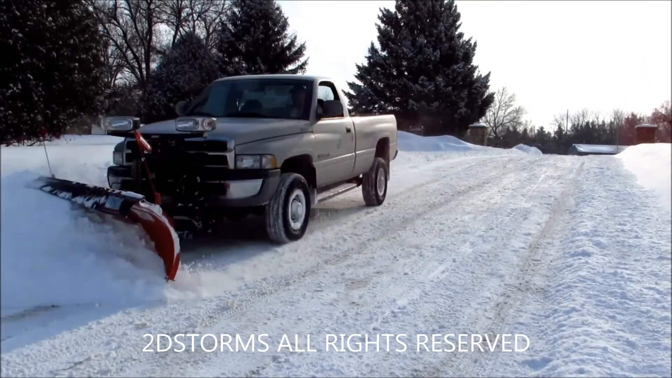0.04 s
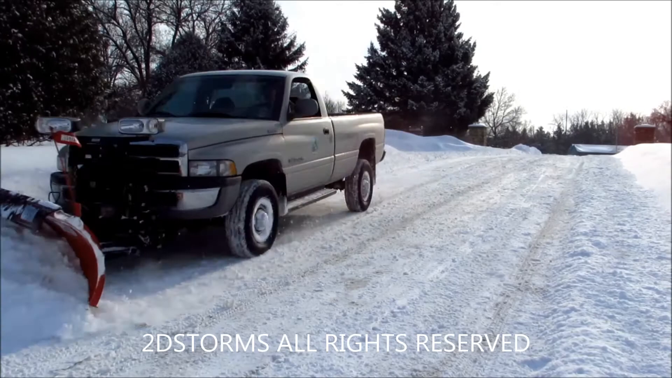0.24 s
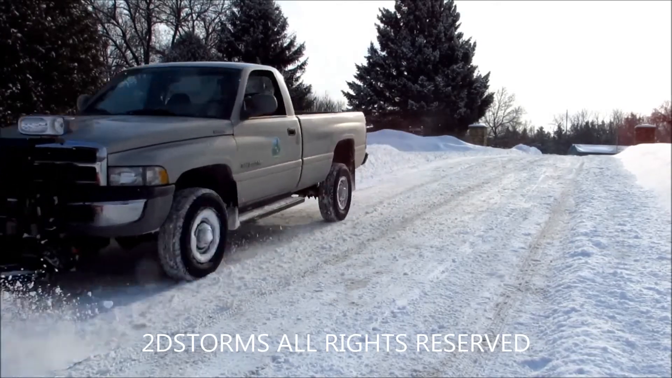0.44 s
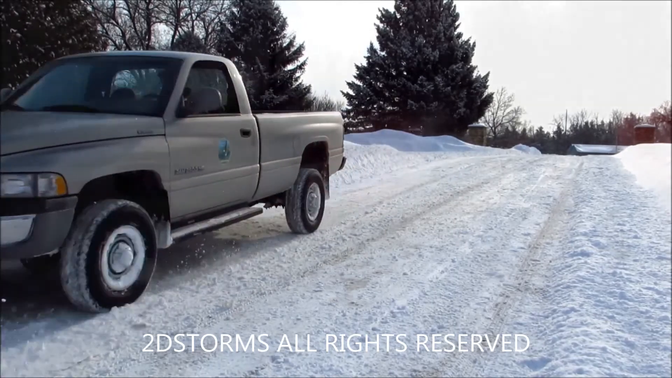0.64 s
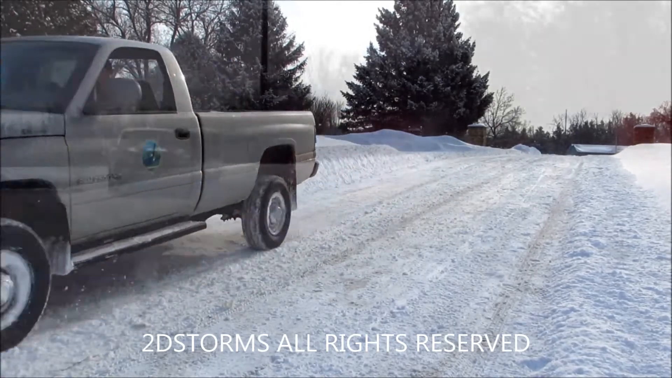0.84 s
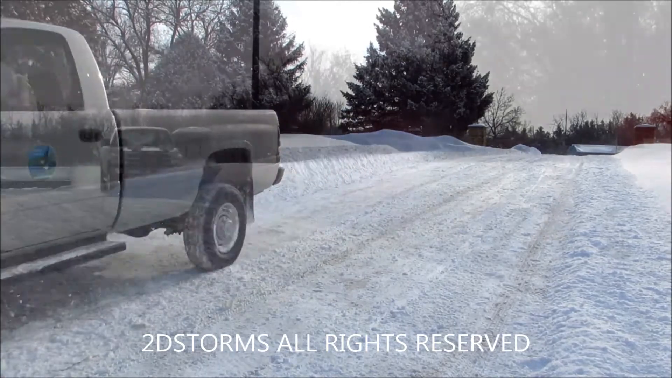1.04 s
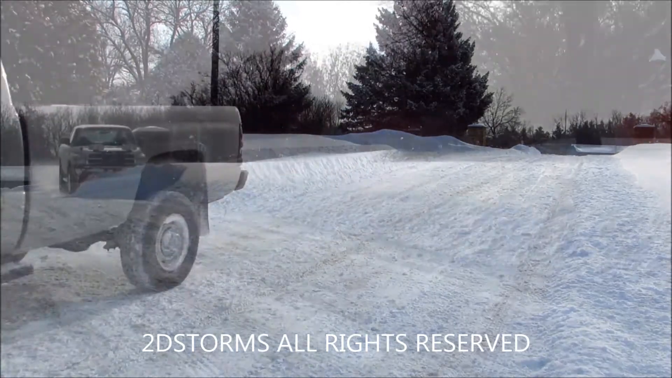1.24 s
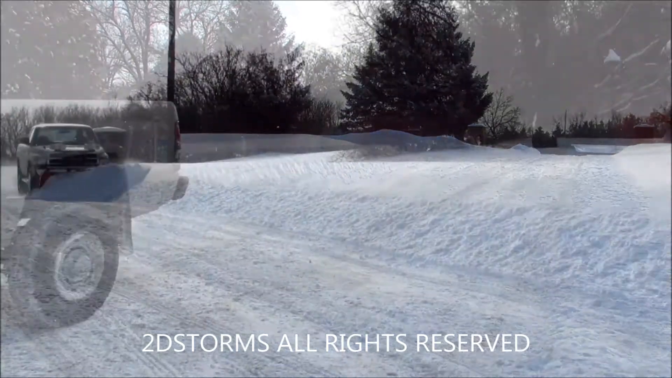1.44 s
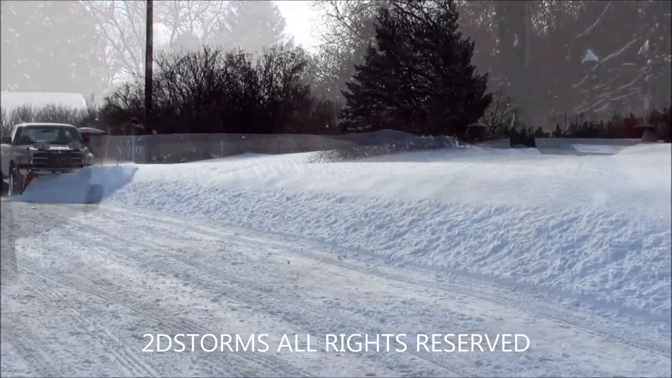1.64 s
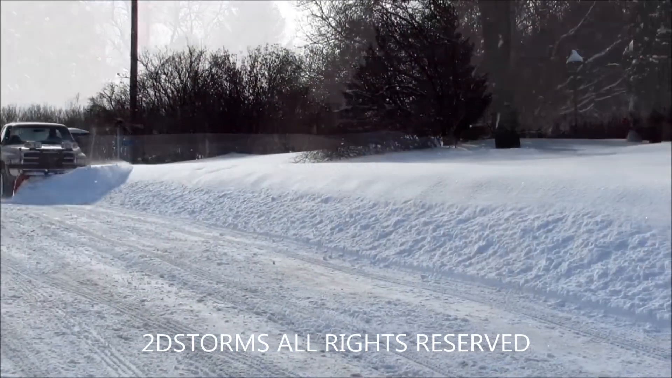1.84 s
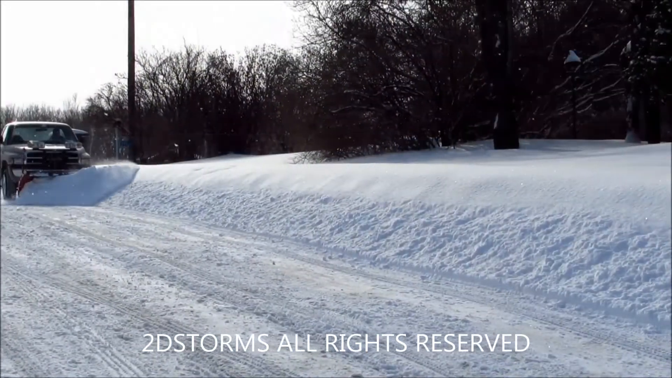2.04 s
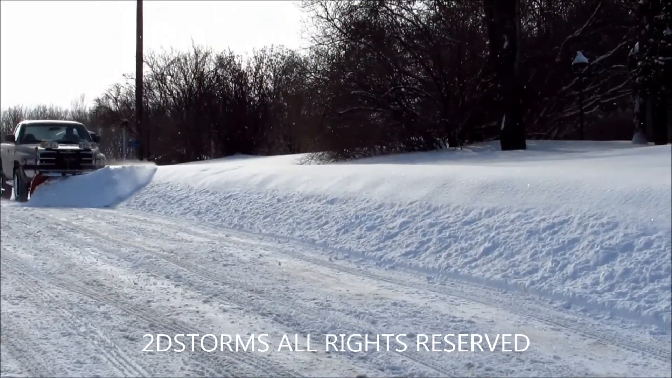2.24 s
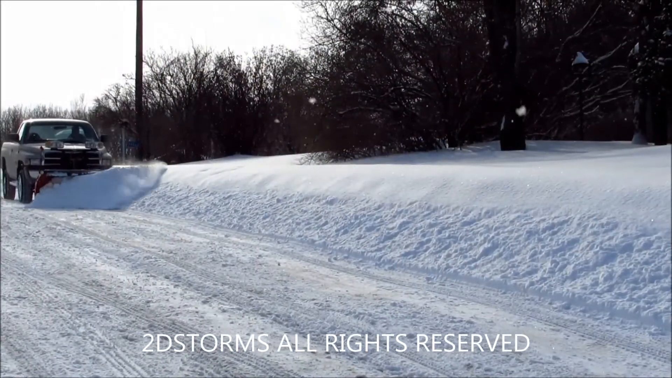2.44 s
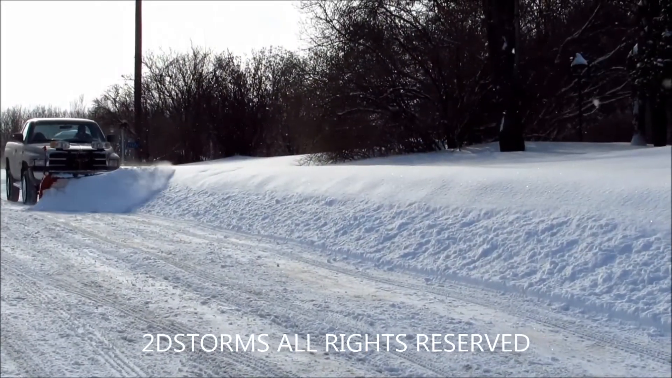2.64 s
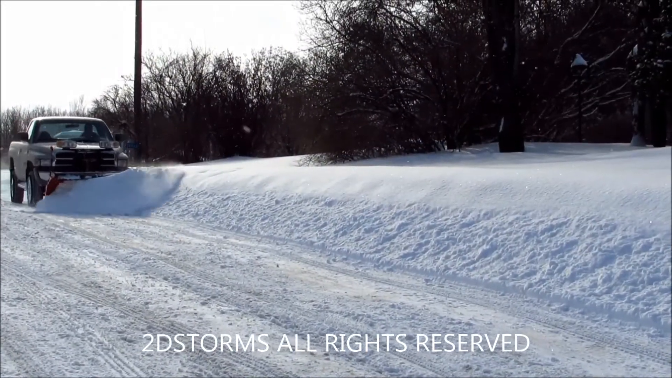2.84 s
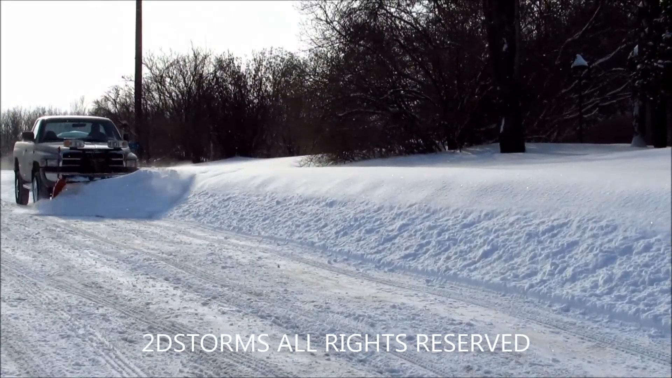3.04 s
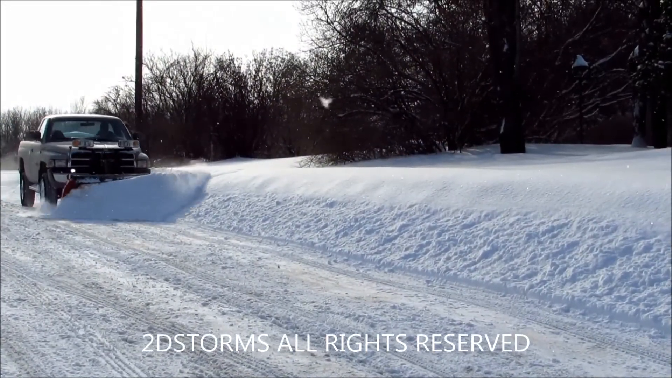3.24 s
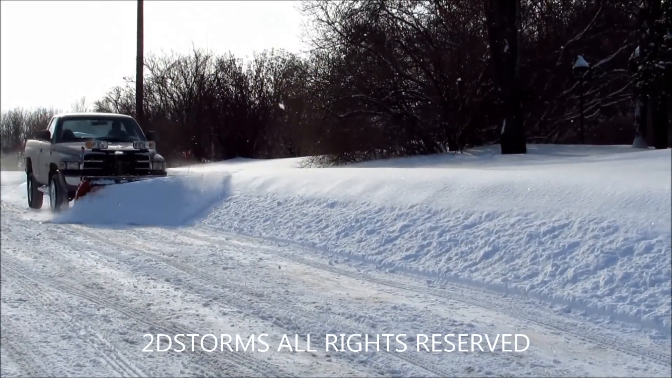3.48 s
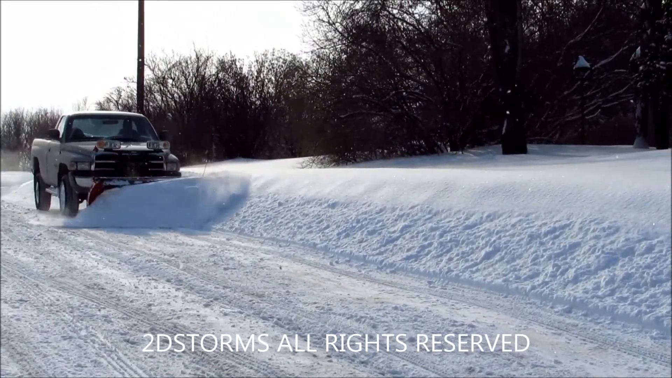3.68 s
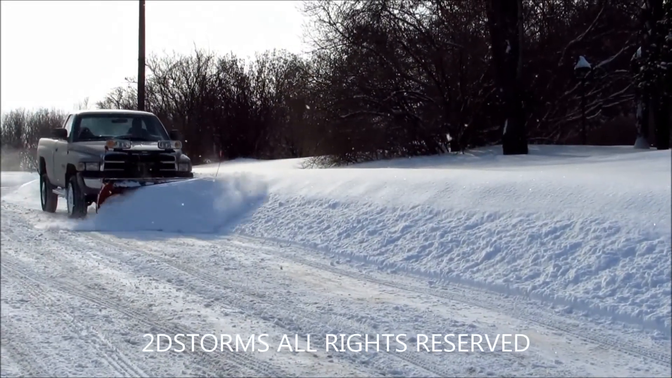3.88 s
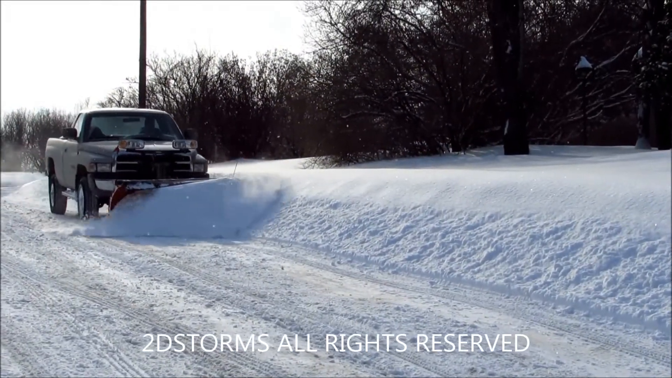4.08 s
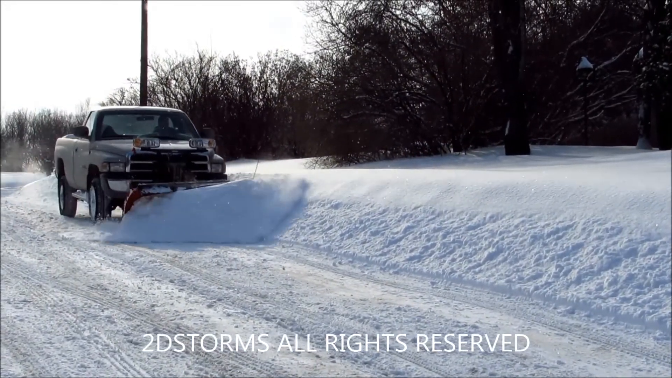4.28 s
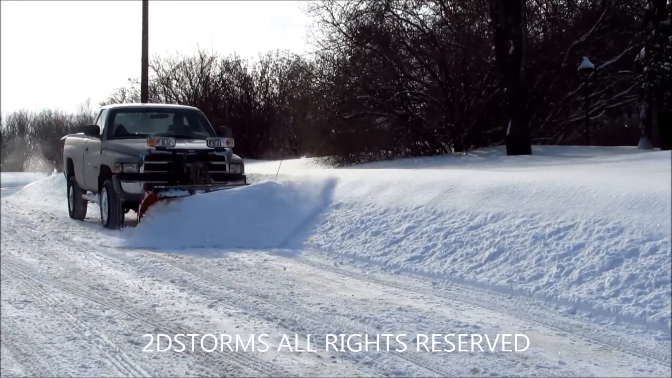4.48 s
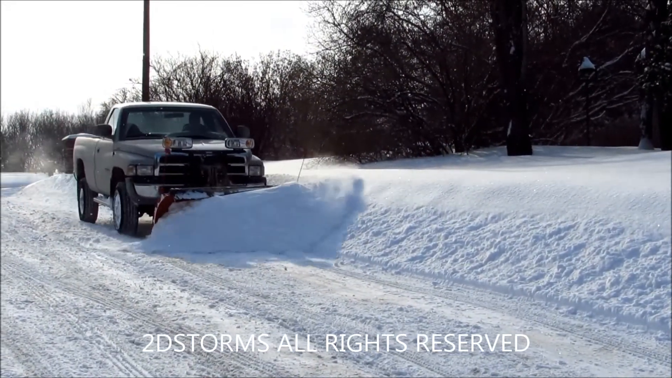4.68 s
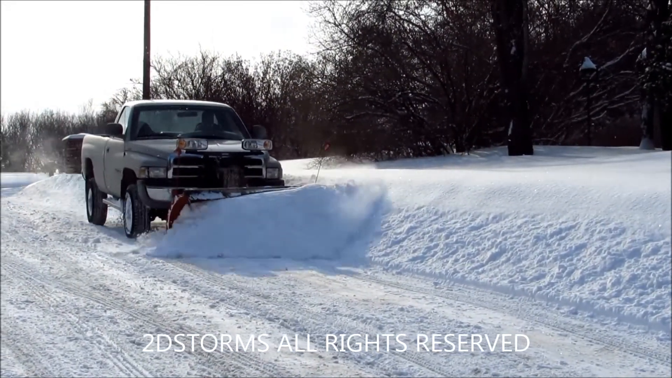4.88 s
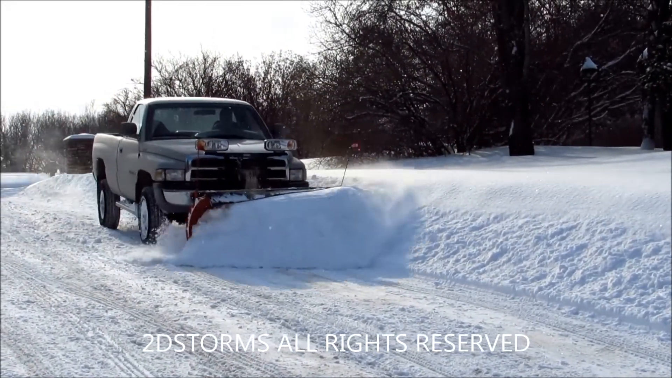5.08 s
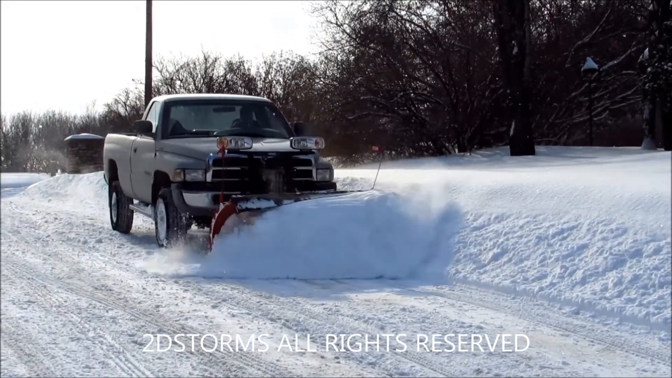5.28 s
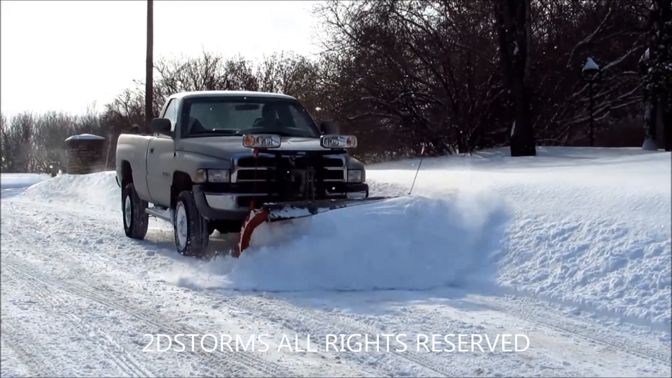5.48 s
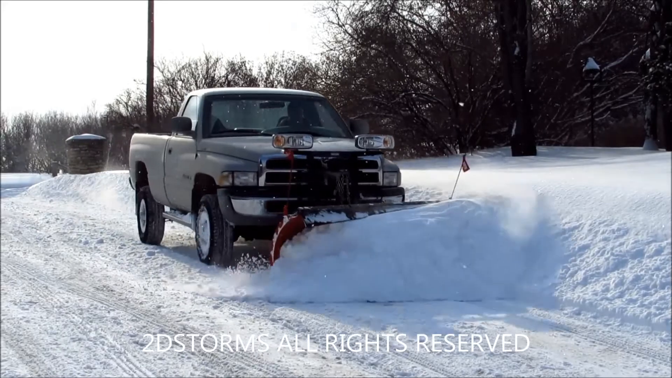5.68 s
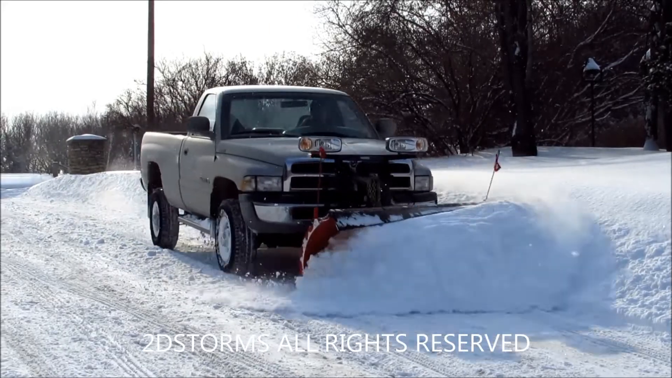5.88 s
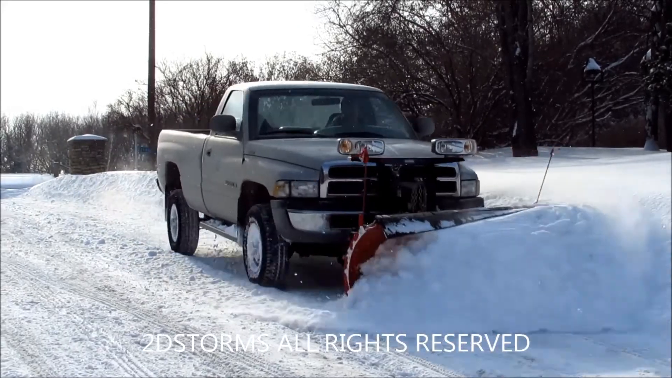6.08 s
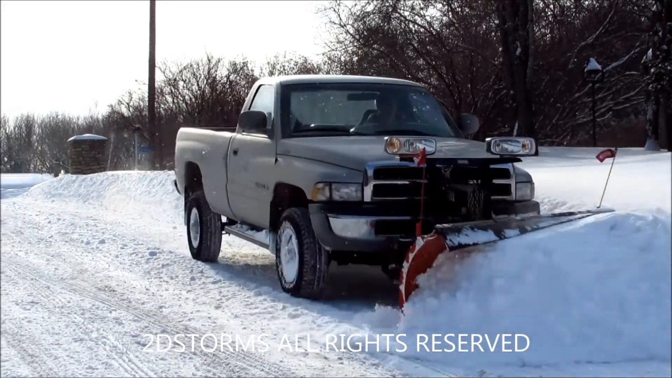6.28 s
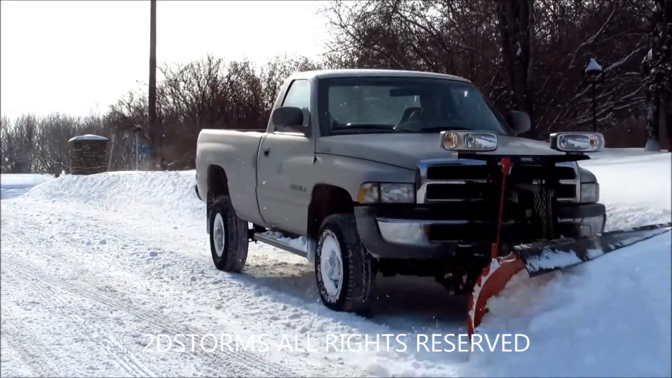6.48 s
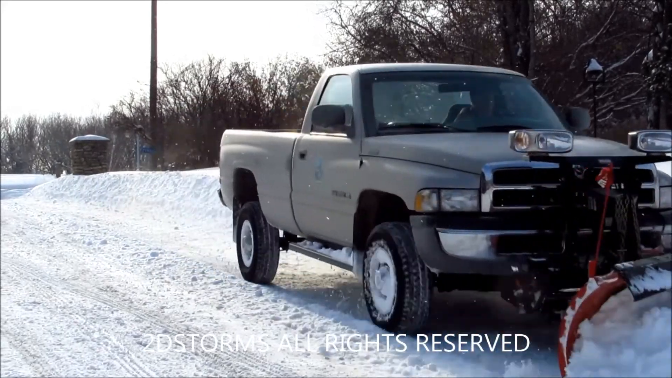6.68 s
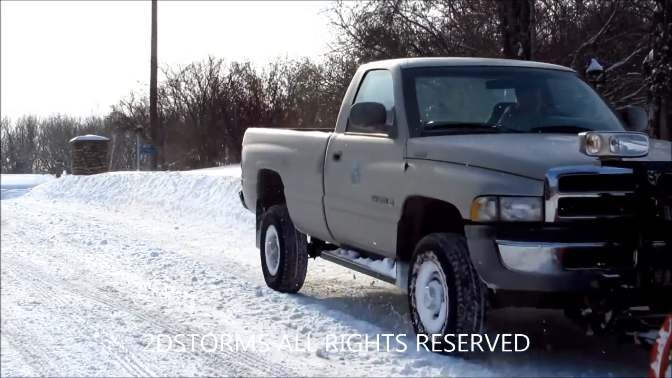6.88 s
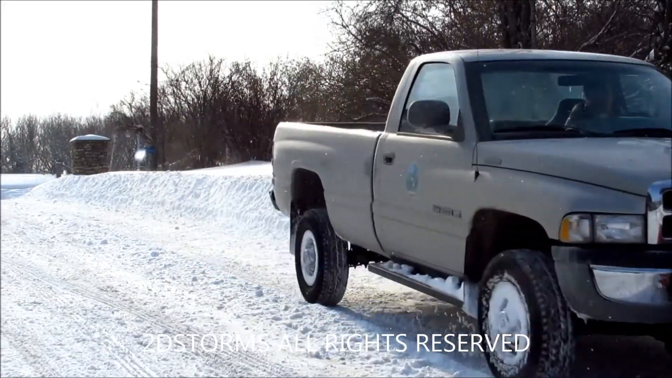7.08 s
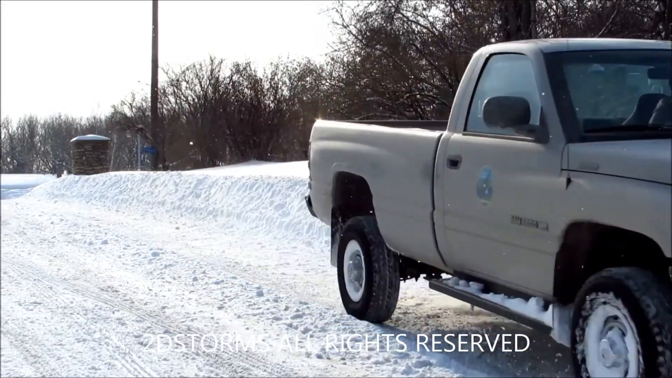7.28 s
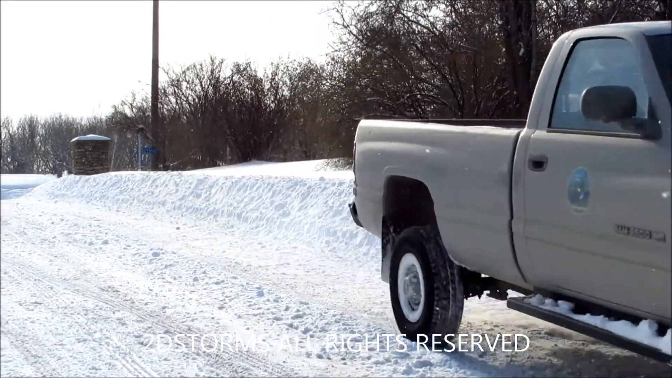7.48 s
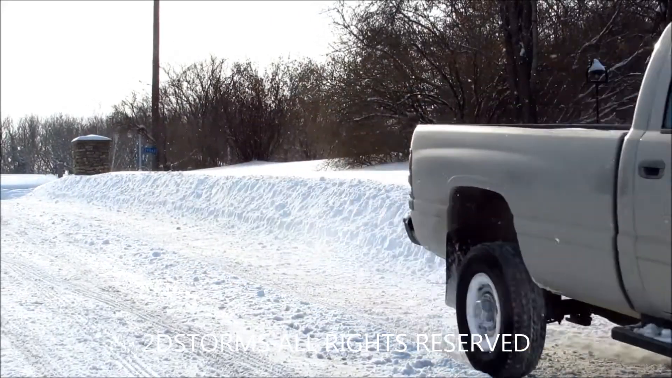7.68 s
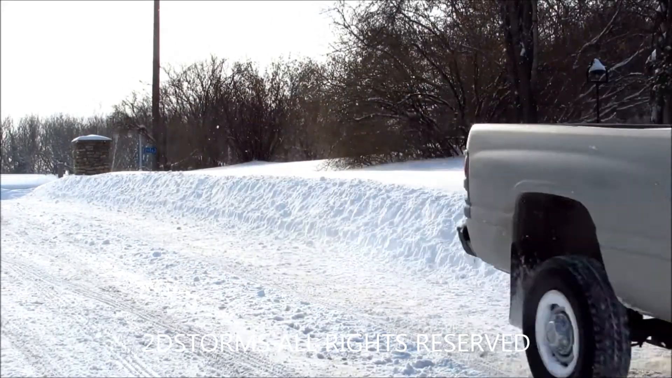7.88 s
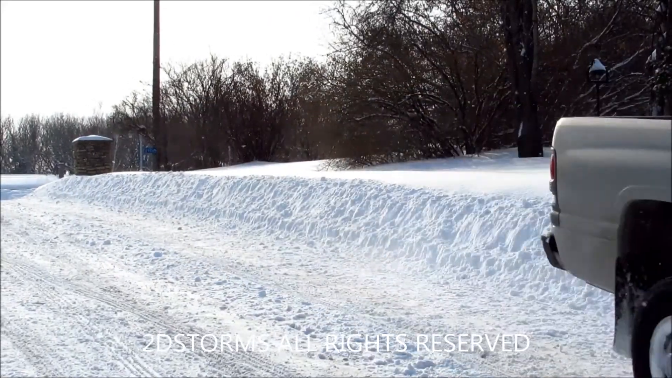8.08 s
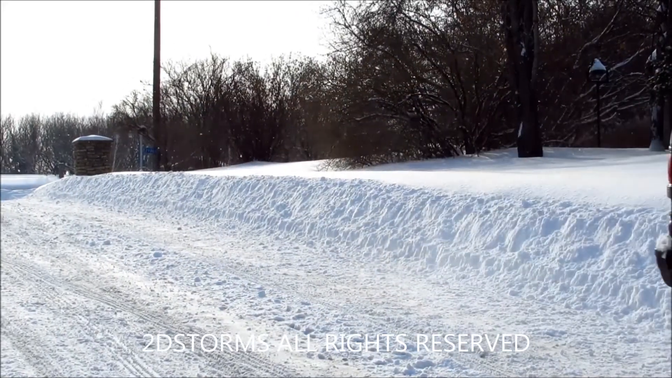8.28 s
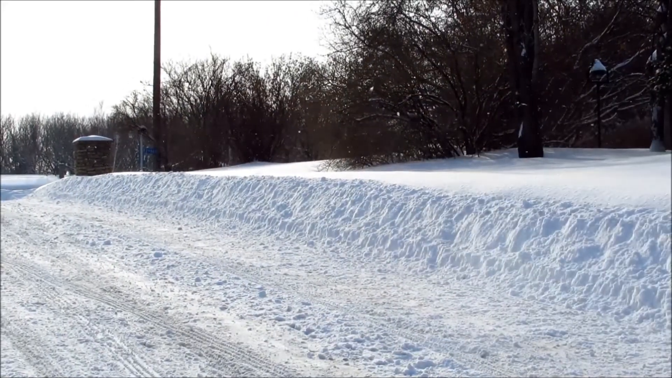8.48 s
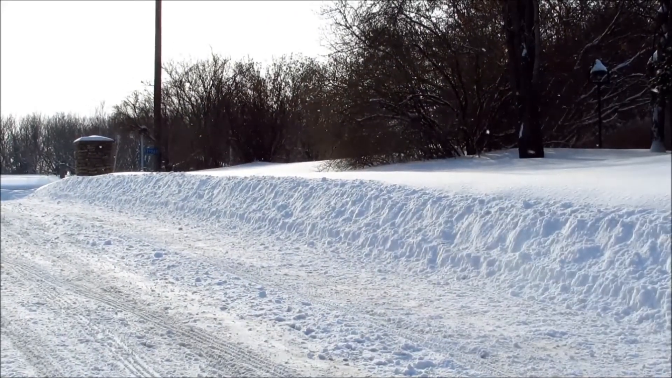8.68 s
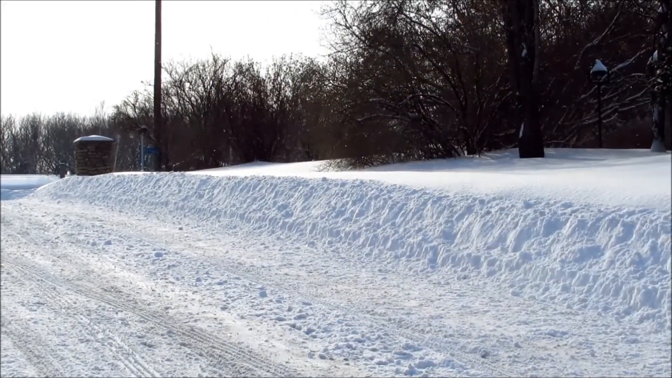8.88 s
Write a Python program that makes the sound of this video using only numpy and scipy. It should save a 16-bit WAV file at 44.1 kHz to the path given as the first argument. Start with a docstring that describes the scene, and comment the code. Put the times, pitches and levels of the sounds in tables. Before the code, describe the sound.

Outdoors on a snowy road, close stereo microphone. A plough truck is already passing, with deep blade rumble, gritty scrape, metallic clanks and dull snow thuds, moving off left. It then returns from a distance, rumble and low exhaust drone growing while loose steel clanks harder and faster. It sweeps past to the right with crunching tyres and thumping snow lumps, then dies away. Small wind buffets bump the microphone.

```python
"""A packed-snow road, where a pickup with a steel snow plough passes twice: first close and leaving, then from afar and past.
Blade, tyres and blown snow are grainy shaped noise; loose plough steel clanks through ringing modes set off by chattering hits.
Lumps of snow thud as short swings with puffs of noise, and the exhaust drones on multiples of the engine cycle.
Slow random curves keep the levels uneven; gusts of low noise buffet the two microphone ports."""
import sys
import numpy as np
from scipy import signal
from scipy.fft import rfft, irfft, next_fast_len
from scipy.io import wavfile
from scipy.ndimage import map_coordinates

SR = 44100
rng = np.random.default_rng(int(sys.argv[2]) if len(sys.argv) > 2 else 0)


def transcribe(u):
    """Save the signal u as a 16-bit wav file named by the first command-line argument.

    u: samples, shape (n,) or (channels, n), limited to [-1, 1]; the rate is SR.
    q: integer samples, one column per channel.
    """
    v = np.clip(np.atleast_2d(u).T, -1, 1)
    q = np.round(v * 32767).astype(np.int16)
    wavfile.write(sys.argv[1], SR, q)


N = 393813

# How loud the rolling truck is over time.
# Each row: time in seconds, blade rumble in dB, scrape in dB, snow spray in dB.
PASS = [(0.0, -17, -29.5, -44.5), (0.27, -27.5, -36.5, -47.5), (0.68, -26.5, -35.5, -45.5),
        (0.86, -31, -38, -51), (1.44, -31, -43, -56), (1.76, -38, -45.5, -57.5), (2.19, -32.5, -45, -55),
        (2.9, -27.5, -41.5, -51), (3.2, -23, -40, -51), (3.5, -26, -39, -51), (4.1, -25, -37, -47),
        (4.82, -23, -35, -46), (5.27, -26.5, -35.5, -48.5), (5.47, -22.5, -32, -45.5),
        (5.67, -18.5, -30.5, -44), (6.39, -27.5, -36.5, -49.5), (6.59, -25, -33.5, -46.5),
        (6.87, -16, -29.5, -43), (7.21, -24, -34, -43), (7.66, -20, -33.5, -42.5),
        (7.93, -28.5, -38.5, -54.5), (8.28, -30, -40.5, -55), (8.6, -33.5, -45.5, -65),
        (8.93, -39.5, -52.5, -73)]
# Where the truck is. Each row: time in seconds, bearing (1 left to -1 right, held at those ends),
# farness (0 to 1), how far the truck hides the blade (0 to 1).
PLACE = [(0, -0.065, 0, 0.7), (1.0, 1, 0.62, 0.92), (1.5, 1, 0, 0.45), (2.0, 0.45, 0.85, 0),
         (3.0, .1, .9, 0), (5.6, .03, .75, 0), (6.4, 0, 0, 0), (7.1, -0.31, 0.08, 0.42),
         (7.6, -0.74, 0, 0.51), (8.1, -1.7, 0.05, 0.45), (8.93, -1.5, 0.6, 1)]
# Modes the plough steel rings with. Each row: frequency in Hz, level in dB, time to fall 60 dB in seconds.
STEEL = [(1640, 7, 0.026), (1760, 3, 0.036), (1930, 6, 0.036), (2180, 7, 0.04), (2680, 4, 0.05),
         (3360, 4, 0.043), (3790, 2, 0.04), (4284, 6, 0.011), (4990, 3, 0.024), (6490, -4, 0.016),
         (7070, -17, 0.03), (10090, -23, 0.06)]

SECOND_PASS_S = 1.6  # start of the second pass


def amp(db):
    """Decibels to amplitude."""
    return 10 ** (np.asarray(db) / 20)


def unit(x):
    """Scale to an rms of 1."""
    return x / np.sqrt(np.mean(x ** 2) + 1e-20)


def along(points, hz):
    """Read (Hz, value) points at any frequency, on a log axis."""
    f, v = np.transpose(points)
    return np.interp(np.log(hz + 1), np.log(f + 1), v)


def curves(rows):
    """One value per sample for each column after the time."""
    s, *columns = np.transpose(rows)
    return [np.interp(np.arange(N) / SR, s, column) for column in columns]


def wobble(rate):
    """A smooth random curve, rate knots a second."""
    knots = rng.standard_normal(int(N * rate / SR) + 4)
    return map_coordinates(knots, [np.arange(N) * rate / SR])


def filtered(x, response):
    """Multiply the spectrum of x by a response of frequency."""
    m = next_fast_len(N + SR // 2)
    return irfft(rfft(x, m) * response(np.fft.rfftfreq(m, 1 / SR)), m)[..., :N]


def gritty(spectrum, per_second, tail_db, share):
    """Stereo noise of rms 1 mixed with sparse grains; the ports share one part and oppose another."""
    # How alike the two ports hear. Each row: frequency in Hz, left-right likeness (1 is identical).
    alike = [(60, .9995), (200, .998), (350, .975), (600, .98), (2000, .995), (4000, .92), (8000, .8),
             (14000, .55)]
    struck = rng.random((2, N)) < per_second / SR
    grains = struck * rng.standard_normal((2, N)) * amp(tail_db * rng.standard_normal((2, N)))
    share = np.clip(share, 0, 1)
    pair = np.sqrt(1 - share) * rng.standard_normal((2, N)) + np.sqrt(share) * unit(grains)

    def response(hz):
        turn = np.arccos(np.clip(along(alike, hz), -1, 1)) / 2
        return amp(along(spectrum, hz)) * [np.cos(turn), np.sin(turn)]

    mid, side = filtered(pair, response)
    return unit(np.array([mid + side, mid - side]))


def rolling():
    """Blade and tyres on the crust, snow off the blade; judder shakes the two low layers together."""
    # Blade rumble spectrum. Each row: frequency in Hz, relative level in dB.
    rumble_shape = [(13, -51), (22, -56), (43, -9.5), (119, 4.5), (184, 3), (238, -2.5), (286, -16.5),
                    (420, -13.5), (550, -18.5), (920, -120)]
    # Tyre crunch spectrum. Each row: frequency in Hz, relative level in dB.
    crunch_shape = [(140, -30), (230, 1.5), (393, -4.5), (607, -3), (829, -9), (1040, -21.5), (1300, -25),
                    (1690, -48), (2860, -120)]
    # Blade scrape spectrum. Each row: frequency in Hz, relative level in dB.
    scrape_shape = [(440, -13), (750, -2), (993, 9.5), (1550, 1.5), (1760, 4.5), (2020, 1.5), (2220, -1.5),
                    (3080, -9), (3350, -9), (7000, -25.5), (9100, -46), (15400, -120)]
    # Snow spray spectrum. Each row: frequency in Hz, relative level in dB.
    spray_shape = [(2350, -13), (4000, 0), (4700, -2), (5850, -3), (12100, -7), (15200, -12), (15800, -16)]
    rumble_db, scrape_db, spray_db = curves(PASS)
    hidden = np.clip(curves(PLACE)[2], 0, 1)
    crunch_db = scrape_db + 2 + 9 * hidden  # the tyres stand out once the truck hides the blade
    judder = wobble(14)
    throb_hz = 10 * (1 + .04 * wobble(2))
    throb_db = 1 * np.cos(2 * np.pi * np.cumsum(throb_hz) / SR)
    rumble_db = rumble_db + 0.25 * judder + throb_db
    rumble = amp(rumble_db) * gritty(rumble_shape, per_second=170, tail_db=3.0, share=0.17)
    crunch_db = crunch_db + 1.3 * judder + 1.2 * wobble(30)
    crunch = amp(crunch_db) * gritty(crunch_shape, per_second=350, tail_db=1.0, share=0.44)
    crackle = wobble(30)  # shared by scrape and spray
    scrape_db = scrape_db + 1.7 * crackle
    scrape = amp(scrape_db) * gritty(scrape_shape, per_second=700, tail_db=3, share=0.4)
    spray_db = spray_db + .9 * crackle + .9 * wobble(8)
    spray = amp(spray_db) * gritty(spray_shape, per_second=1500, tail_db=3.5, share=0.1)
    return rumble + crunch + scrape + spray


def rings():
    """Each mode of the steel dying away at unit strength, slightly detuned."""
    t = np.arange(SR // 10) / SR
    hz, _, t60 = np.transpose(STEEL)[..., None]
    detuned_hz = hz * (1 + .006 * rng.standard_normal(hz.shape))
    return amp(-60 * t / t60) * np.sin(2 * np.pi * detuned_hz * t)


def clank(ringing, treble_db, length, chatter_db):
    """One blow: a hit, then a chatter of small duller hits that stops short, through the modes at new strengths."""
    # The countless small modes between the clear ones. Each row: frequency in Hz, relative level in dB.
    plate_shape = [(500, -51), (1200, -5), (1500, -14), (1650, 2.5), (2300, 5), (3100, -2), (5000, -3.5),
                   (6500, -8), (7500, -10.5), (16000, -23.5)]
    t = np.arange(SR // 10) / SR

    def tilt_db(hz):
        return treble_db * np.clip(np.log2(hz / 3000 + 1e-3) / 2.26, 0, 1.3)

    hz, level_db, _ = np.transpose(STEEL)
    muffle_db = .5 * max(treble_db, 0)  # bright blows are packed with snow and ring less
    mode_db = level_db - muffle_db + tilt_db(hz) + 2.6 * rng.standard_normal(hz.shape)
    modes = amp(mode_db) @ ringing
    f = np.fft.rfftfreq(len(t), 1 / SR)
    # each blow lands on another spot, with its own uneven spectrum
    spot_db = np.interp(f, np.linspace(0, SR / 2, num=40), 2.5 * rng.standard_normal(size=40))
    plate_gain = amp(along(plate_shape, f) + tilt_db(f) + spot_db)
    plate = unit(irfft(rfft(rng.standard_normal(len(t))) * plate_gain, len(t)))
    plate *= 1 - np.exp(-t / 0.0003)  # the contact is not instant
    plate *= amp(20 - 60 * t / .011)
    bounce = 1 + 0.5 * np.cos(2 * np.pi * t / rng.uniform(0.0078, 0.014))
    hits = (rng.random(len(t)) < 6000 / SR) * rng.standard_normal(len(t))
    hits = signal.lfilter(*signal.butter(1, 6840, fs=SR), hits)  # later contacts are duller
    stop = amp(-6 * (t / max(length, .003)) ** 3)
    faint_tail = amp(-8 - 60 * t / .2)
    chatter = amp(chatter_db) * hits * bounce * (stop + faint_tail)
    chatter[0] = 1  # the first hit
    sound = signal.fftconvolve(chatter, modes + plate)[:len(t)]
    return sound / np.std(sound[:SR // 50]) / amp(11)  # 11 dB allows for the crest of the blow


def plough():
    """Loose steel knocks in loud clanks, and a faint random rattle thickens in their wake."""
    # The clear clanks. Each row: start in seconds, level in dB, treble tilt in dB.
    clanks = [(0.0094, -16.5, -22), (0.076, -19.5, -38), (0.051, -26, -17), (0.092, -34, -10),
              (0.131, -20.5, -9), (0.188, -20.5, 10), (0.236, -17, -27), (0.2527, -21.5, -12),
              (0.278, -23.5, 12), (0.837, -30, 9), (1.1045, -27, -9), (1.1483, -27.5, 7), (1.2257, -30, 14),
              (1.307, -28, 9), (1.4621, -28, -21), (1.524, -28, 11), (1.706, -34, 15), (1.837, -26.5, -2),
              (1.89, -23.5, 4), (1.945, -27, -4), (2.2838, -24.5, -12), (2.3353, -21.5, -8),
              (2.3426, -27, -19), (2.597, -27.5, 18), (2.642, -28, 0), (2.667, -26, -13),
              (2.8852, -30.5, -16), (3.009, -23, -10), (3.0227, -18, -12), (3.093, -21.5, -6),
              (3.175, -14.5, -2.5), (3.255, -25.5, -3), (3.397, -25.5, -17), (3.477, -25, -40),
              (3.5677, -26.5, -5), (3.6204, -19.5, -5), (3.6365, -16.5, 3), (3.707, -27, 6),
              (3.7313, -22.5, -8), (3.774, -27, -8), (4.0716, -29, 3), (4.156, -12, -9), (4.2143, -23, -5),
              (4.2367, -19, -2), (4.308, -17, 10), (4.345, -25, 19), (4.365, -24, -4), (4.4853, -14.5, 2.5),
              (4.567, -26, 3), (4.6905, -15, 0), (4.707, -15, 1), (4.755, -21, -1), (4.877, -27, -21),
              (4.9357, -8, -8), (5.009, -26.5, 8), (5.2344, -11, -12), (5.3037, -10.5, -4),
              (5.3336, -17, 4), (5.3795, -21.5, -11), (5.402, -23, 28), (5.431, -22.5, -13),
              (5.535, -20, -20), (5.557, -18, -7), (5.617, -27, 26), (5.644, -12, 17), (5.6738, -19, 8),
              (5.693, -10, 3), (5.703, -11, 8), (5.729, -19, 10), (5.7571, -7.5, -4), (5.772, -20, 12),
              (5.809, -24, -11), (5.826, -20.5, -5), (5.8498, -20.5, -9), (6.061, -24, -1),
              (6.1063, -19.5, -6), (6.128, -19.5, -4), (6.215, -17, -6), (6.2508, -10, -16),
              (6.272, -6.5, -8.5), (6.2939, -17, -7), (6.534, -25, 30), (6.6022, -12.5, -7),
              (6.6173, -14.5, -23), (6.681, -17.5, -13), (6.7278, -21.5, 17), (6.789, -7, -17),
              (6.8536, -19.5, 15), (6.8815, -21, -8), (6.927, -17, -17), (6.9584, -23, -14),
              (6.997, -17, -7), (7.009, -21, -4), (7.022, -15.5, 0), (7.037, -17.5, -6), (7.056, -19, -5),
              (7.218, -26, 16), (7.528, -22.5, 11), (7.633, -26, 2), (7.735, -20, 0), (7.7654, -15, 19),
              (7.806, -18, 12), (7.9326, -24, -16), (7.9929, -20.5, -3), (8.037, -22, 3), (8.1613, -33, -2),
              (8.641, -34, -10)]
    rattles, mean_lag_s = 330, .06
    out = np.zeros(N + SR)
    for s, db, treble_db in clanks:
        length = 0.016 * amp(rng.normal(0, 1))
        chatter_db = -13.5 - 1.5 * max(db + 9.5, 0)  # the hardest blows chatter less
        out[round(s * SR):][:SR // 10] += amp(db) * clank(rings(), treble_db, length, chatter_db)
    scrape_db = curves(PASS)[1]
    for which, wait, size, treble in rng.random(size=(rattles, 4)):
        after_s = clanks[int(which * len(clanks))][0]
        at = min(int((after_s - mean_lag_s * np.log(1 - wait)) * SR), N - 1)
        gain = amp(scrape_db[at] + 0.5 - 2.5 * size)
        out[at:at + SR // 10] += gain * clank(rings(), -14 + 18 * treble, length=0.013, chatter_db=-18.5)
    return out[:N]


def exhaust():
    """Uneven firing sounds multiples of the engine cycle that swell with the rumble; a faint hum comes late."""
    # Exhaust tones. Each row: multiple of the engine cycle, level in dB over the rumble, gain from afar.
    drone = [(6, -12, 0), (7, -11, 0), (8, -8, 1.3), (10, -4, .35), (14, -3, .45)]
    # Engine speed. Each row: time in seconds, engine cycles a second.
    speed = [(1.7, 12.2), (2.6, 12.8), (3.05, 12.3), (4.3, 12.3), (4.7, 13.3), (5.4, 13.05), (8.3, 13.0),
             (8.93, 11.5)]
    t = np.arange(N) / SR
    near = np.clip((t - 5.5) / 0.97, 0, 1)  # the tailpipe comes near
    turns = np.cumsum(curves(speed)[0] * (1 + .004 * wobble(5))) / SR

    def tone(phase):
        return amp(2.5 * wobble(6)) * np.sin(2 * np.pi * (phase + .07 * wobble(10)))

    hum_hz, hum_db, hum_at_s, hum_spread_s = 332, -43, 8.72, 0.27  # as the truck recedes
    hum_swell = amp(hum_db) * np.exp(-((t - hum_at_s) / hum_spread_s) ** 2)
    hum = hum_swell * tone(hum_hz * t + 0.35 * wobble(9))
    tones = 0
    for multiple, db, afar in drone:
        tones = tones + amp(db) * (afar + (1 - afar) * near) * tone(multiple * turns)
    facing_db = 3 * (t > 7.9)  # the tailpipe faces the microphone
    return amp(curves(PASS)[0] + facing_db) * (t > SECOND_PASS_S) * tones + hum


def thuds():
    """Each lump gives a low swing that builds, then dies, a dull puff of noise and a short crack as it breaks."""
    # Lumps of snow hitting the truck. Each row: start in seconds, level in dB, pitch in Hz, crack in dB.
    lumps = [(0.009, -11, 141, -19), (0.232, -9.5, 132, -17), (0.244, -12, 301, -29),
             (0.327, -24, 308, -1.5), (0.628, -8.5, 196, -29), (0.839, -6, 166, -25),
             (0.938, -8.5, 155, -35), (1.092, -17.5, 268, -33), (1.149, -12, 158, -33),
             (1.288, -11.5, 190, -34), (1.469, -17.5, 221, -11), (1.53, -19, 264, -10),
             (5.603, -12.5, 155, -14.5), (6.065, -10.5, 182, -17.5), (6.207, -7.5, 223, -20),
             (6.541, -14.5, 195, -18), (6.712, -14, 174, -31), (6.885, -21, 176, -50),
             (7.049, -9, 216, -13), (7.489, -18.5, 320, -0.5), (7.528, -21, 302, -1.5),
             (7.548, -10.5, 198, -20), (7.562, -8, 206, -20), (7.591, -9, 174, -19), (7.753, -7, 136, -17),
             (7.787, -7.5, 162, -25), (7.884, -8, 248, -22)]
    out, t = np.zeros(N + SR), np.arange(SR // 8) / SR
    dull = signal.butter(2, [120, 500], "band", fs=SR)
    bright = signal.butter(2, [450, 1500], "band", fs=SR)
    soft_s, sharp_s = .011, .0012  # attack in the pile before the blade, and under the truck
    attack_s = np.interp(curves(PLACE)[2], [0, .5], [soft_s, sharp_s])
    for s, db, hz, crack_db in lumps:
        rise = attack_s[round(s * SR)]
        after = np.clip(t - 2 * rise, 0, None)
        swing = np.sin(2 * np.pi * hz * t) * amp(-60 * after / 0.055)
        puff = unit(signal.lfilter(*dull, rng.standard_normal(len(t))))
        puff *= amp(-8.0 - 60 * after / 0.12)
        crack = unit(signal.lfilter(*bright, rng.standard_normal(len(t))))
        crack *= amp(crack_db - 60 * after / 0.053)
        out[round(s * SR):][:len(t)] += amp(db) * (swing + puff + crack) * (1 - np.exp(-t / rise))
    return out[:N]


def powder():
    """An airy swell of fine hiss, perhaps blown snow, different at each port."""
    middle_s, spread_s, level_db, above_hz = 2.7, 0.32, -57, 9000
    t = np.arange(N) / SR
    noise = rng.standard_normal((2, N))
    hiss = unit(filtered(noise, lambda hz: 1 / (1 + (above_hz / (hz + 1)) ** 4)))
    return hiss * amp(level_db + 1.5 * wobble(20)) * np.exp(-((t - middle_s) / spread_s) ** 2)


def tick():
    """One thin high tick close by: a burst of narrow noise that starts at once and dies away."""
    start_s, level_db, centre_hz, width_hz, t60_s = 8.578, -43, 12600, 830, 0.073
    t = np.arange(N) / SR - start_s
    noise = rng.standard_normal(N)
    hiss = unit(filtered(noise, lambda hz: np.exp(-((hz - centre_hz) / width_hz) ** 2)))
    return hiss * (t > 0) * amp(level_db - 60 * np.abs(t) / t60_s)


def placed(x):
    """From afar the echo off the snow cancels a band; from the side one port hears first."""
    # Port timing with the truck fully left. Each row: frequency in Hz, radians the left port leads.
    lead = [(250, 0), (700, .52), (2200, .3), (4000, .4), (6500, .95), (10000, 2.1), (14000, 2.2)]
    # Port balance with the truck fully left. Each row: frequency in Hz, dB the left port is louder.
    louder = [(200, -0.2), (450, -1.2), (800, 0.5), (1300, 3.5), (2300, 2), (5000, 0.75), (12000, .2)]
    bearing, far, _ = np.clip(curves(PLACE), -1, 1)
    x = x - 0.84 * far * filtered(x, lambda hz: np.exp(-((hz - 660) / 110) ** 2))

    def sides(hz):
        half = amp(along(louder, hz) / 2) * np.exp(.5j * along(lead, hz))  # half the difference per port
        return np.array([[half, 1 / half], [1 / half, half]])

    left, right = filtered(x, sides)
    return (1 - abs(bearing)) * x + np.clip(bearing, 0, 1) * left + np.clip(-bearing, 0, 1) * right


def wind():
    """A breeze and short gusts buffet each microphone port on its own, as lumpy low noise."""
    # Gusts on the ports. Each row: middle in seconds, level in dB, length in seconds.
    gust_rows = [(1.75, -31, 0.17), (2.097, -29.5, 0.22), (2.403, -37.5, 0.35), (2.677, -33, 0.11),
                 (3.496, -25, 0.084), (3.744, -23, 0.11), (4.708, -25, 0.13), (5.165, -29.5, 0.19),
                 (7.012, -24, 0.11), (7.19, -32, 0.24), (7.467, -20.5, 0.11)]
    # Spectrum of the buffeting. Each row: frequency in Hz, relative level in dB.
    buffet_shape = [(25, -34), (60, -5), (120, 5.5), (230, 5), (330, -1), (500, -12), (900, -30),
                    (2000, -120)]
    t = np.arange(N) / SR
    gusts = sum(amp(db) * np.exp(-(3.84 * (t - s) / length) ** 2) for s, db, length in gust_rows)
    lumps = amp(2.5 * np.array([wobble(24), wobble(24)]))
    buffet = filtered(rng.standard_normal((2, N)), lambda hz: amp(along(buffet_shape, hz)))
    # the breeze is up early in the second pass, then weaker
    fade = np.interp(t, [SECOND_PASS_S, SECOND_PASS_S + .2, 3.66, 3.66 + .3], [0, 1, 1, .3])
    breeze = amp(-46.5 + 4 * wobble(4)) * fade
    return (gusts + breeze) * unit(lumps * buffet)


def scene():
    """Truck, plough and snow placed on the road, with the wind straight on the ports."""
    return placed(rolling() + exhaust() + plough() + powder() + thuds() + tick()) + wind()


def record(dry):
    """The recorder adds a faint thin whistle, favours the left port in places and cuts off the top."""
    # Left port over right in the low middle. Each row: frequency in Hz, difference in dB.
    left_over_right = [(200, 0), (400, 0.7), (700, 0.8), (1100, 0)]
    whistle_hz, top_hz = 15734, 15920
    whistle = amp(-81) * np.sin(2 * np.pi * whistle_hz * np.arange(N) / SR)

    def ports(hz):
        half_db = along(left_over_right, hz) / 2
        return amp([half_db, -half_db]) * (hz < top_hz)

    return filtered(dry + whistle, ports)


dry = scene()
out = record(dry)
transcribe(out)
```